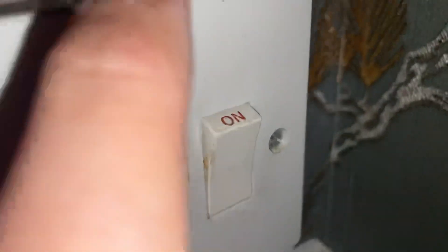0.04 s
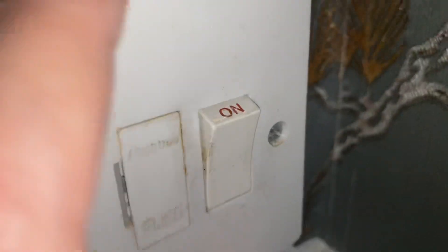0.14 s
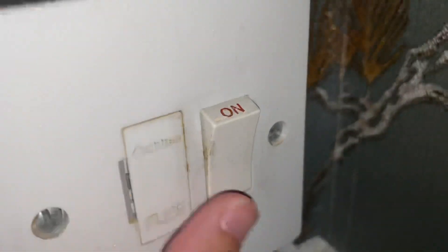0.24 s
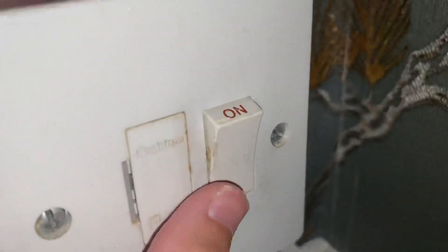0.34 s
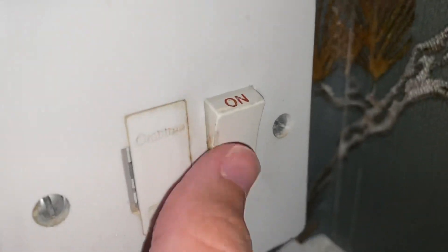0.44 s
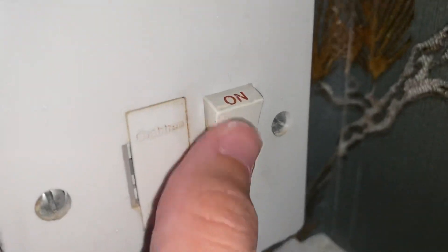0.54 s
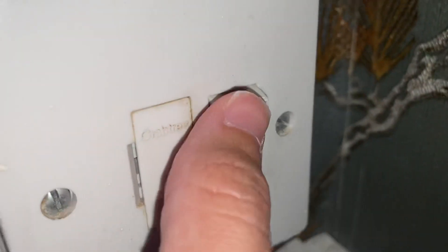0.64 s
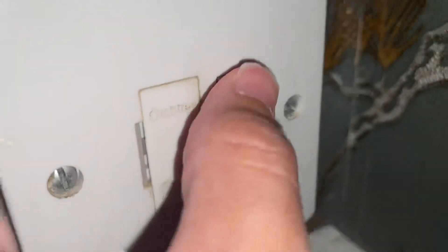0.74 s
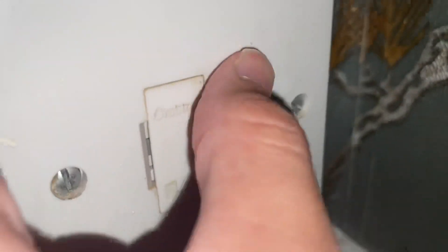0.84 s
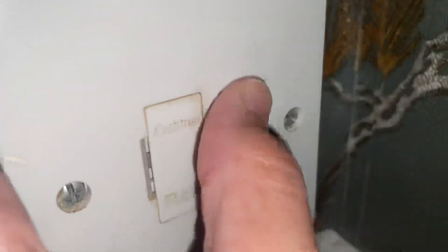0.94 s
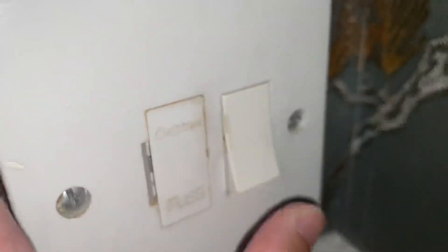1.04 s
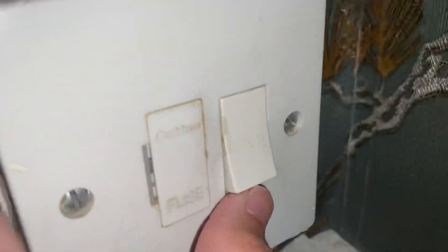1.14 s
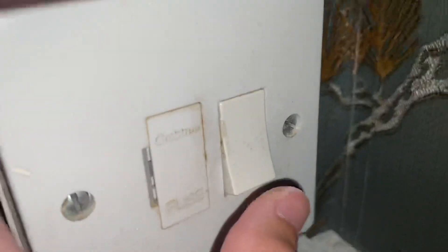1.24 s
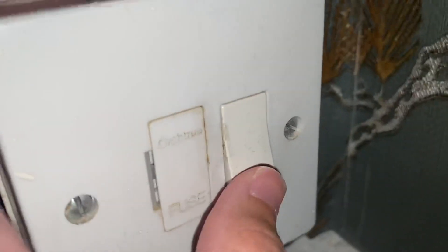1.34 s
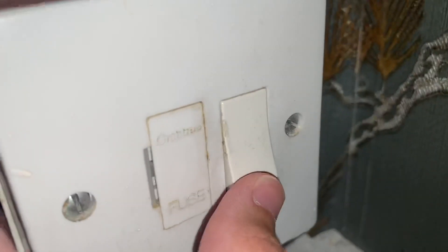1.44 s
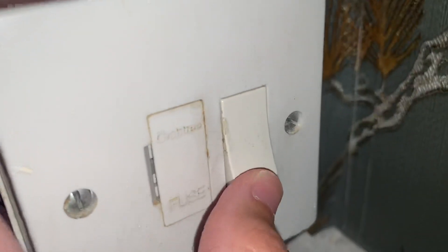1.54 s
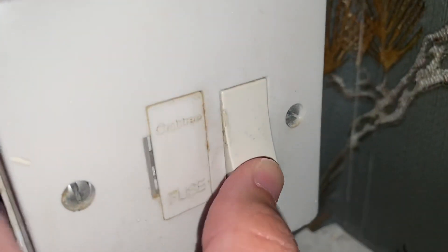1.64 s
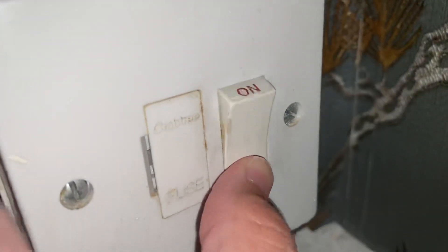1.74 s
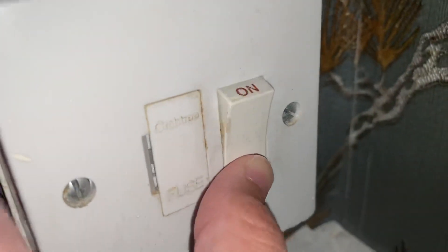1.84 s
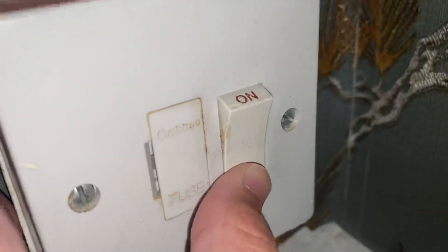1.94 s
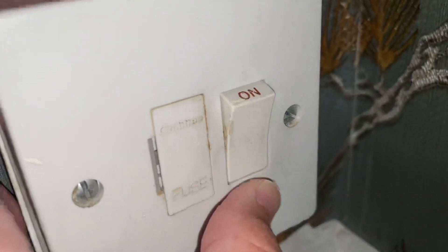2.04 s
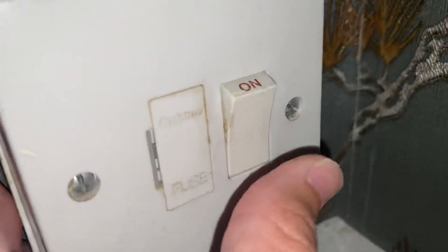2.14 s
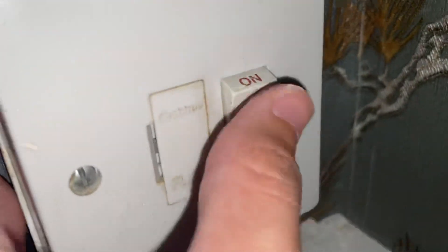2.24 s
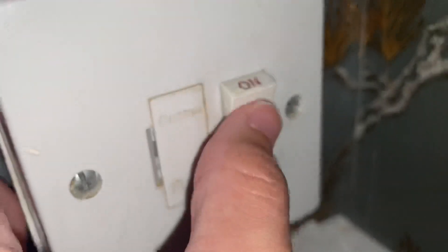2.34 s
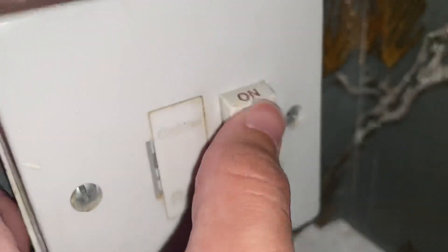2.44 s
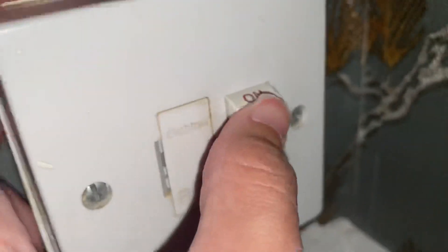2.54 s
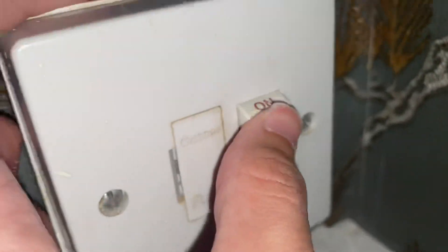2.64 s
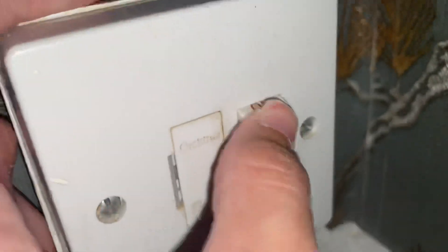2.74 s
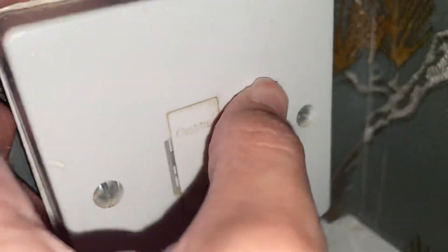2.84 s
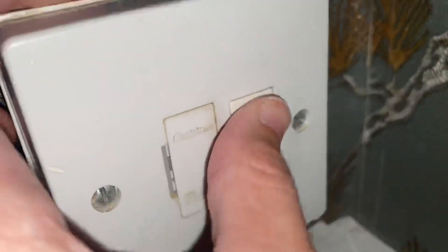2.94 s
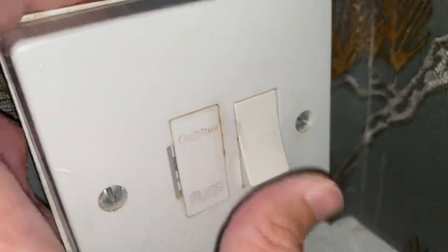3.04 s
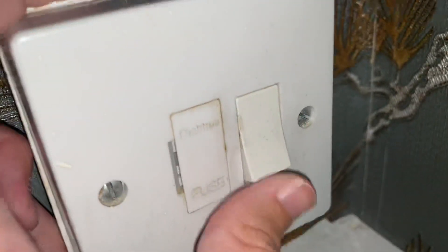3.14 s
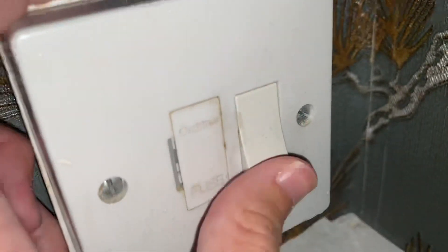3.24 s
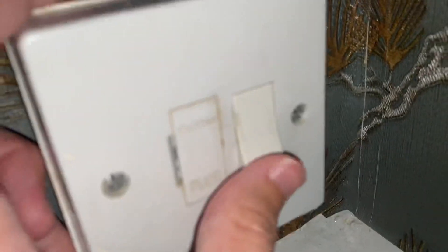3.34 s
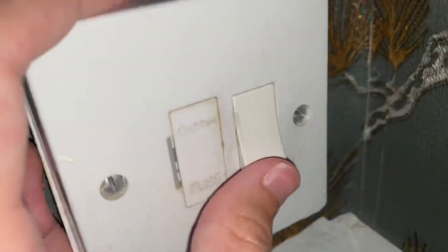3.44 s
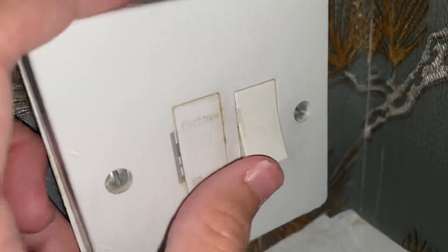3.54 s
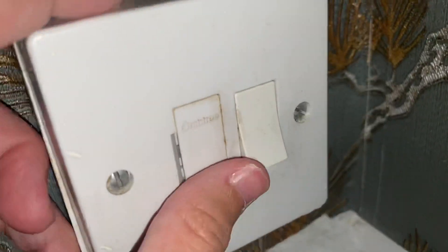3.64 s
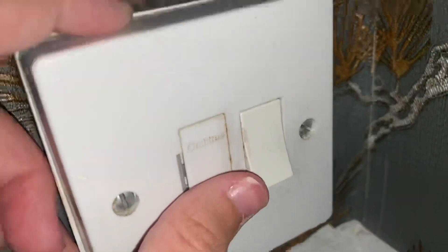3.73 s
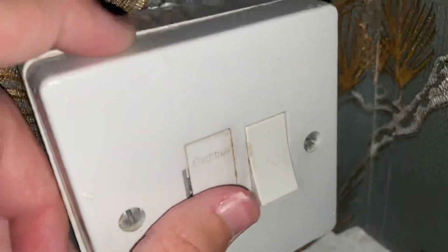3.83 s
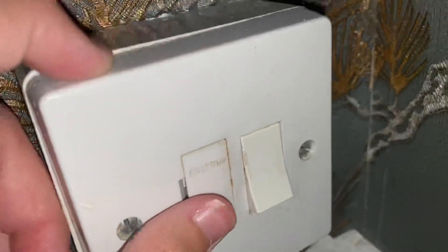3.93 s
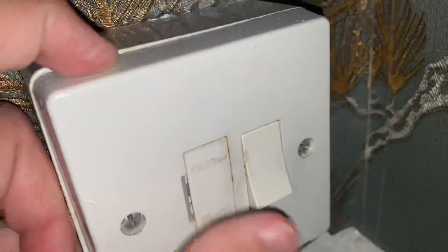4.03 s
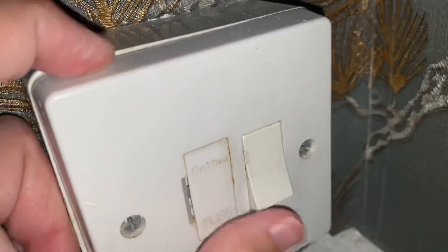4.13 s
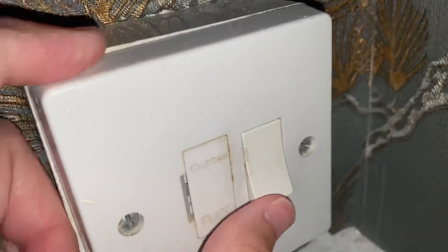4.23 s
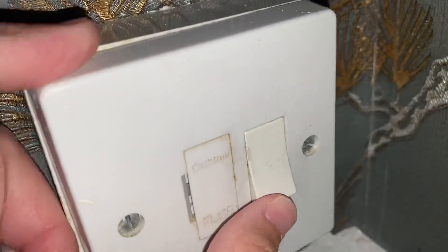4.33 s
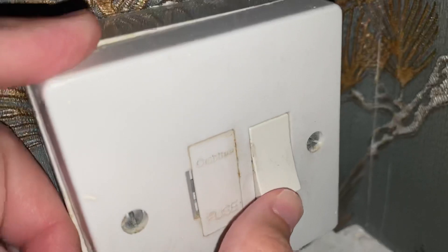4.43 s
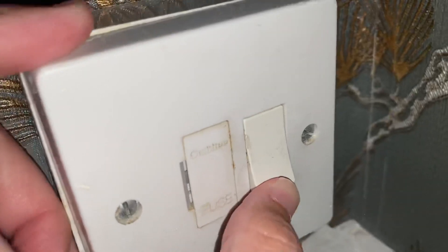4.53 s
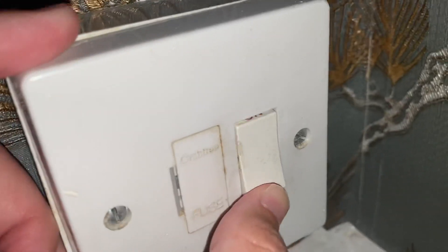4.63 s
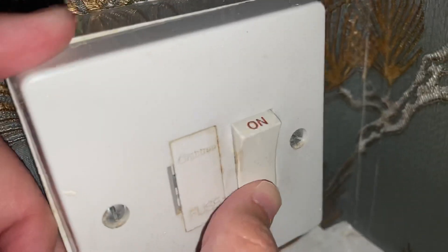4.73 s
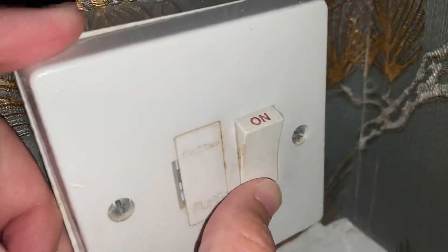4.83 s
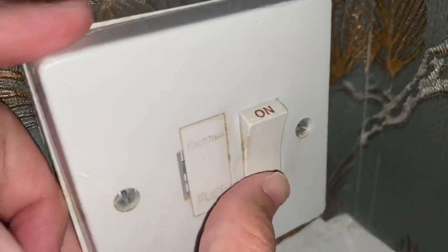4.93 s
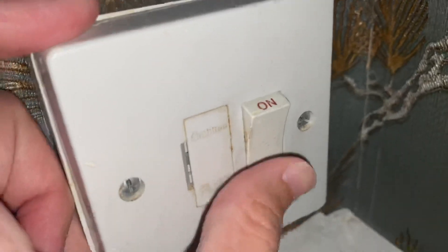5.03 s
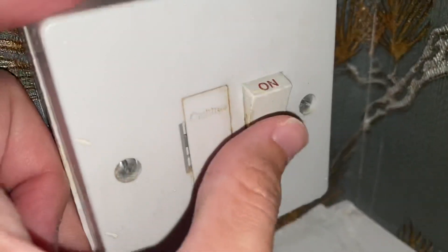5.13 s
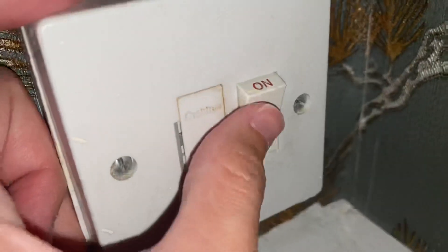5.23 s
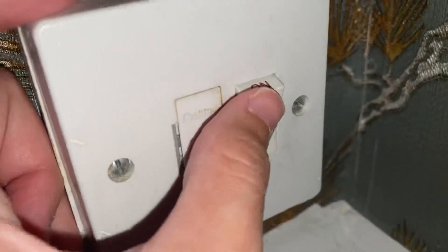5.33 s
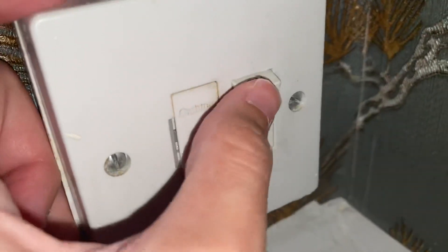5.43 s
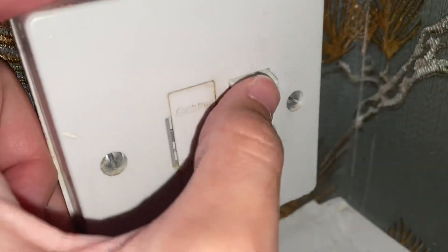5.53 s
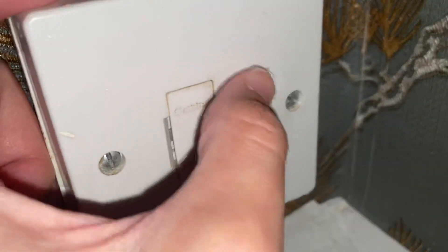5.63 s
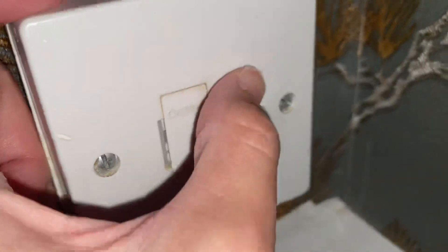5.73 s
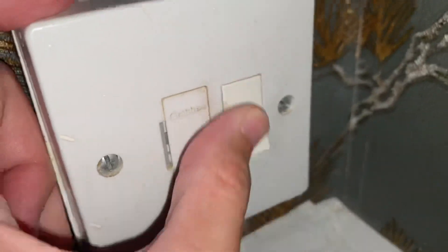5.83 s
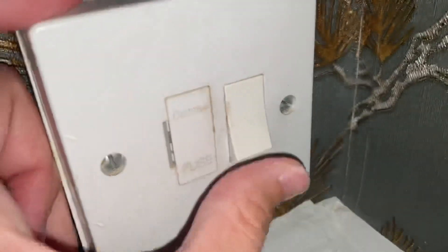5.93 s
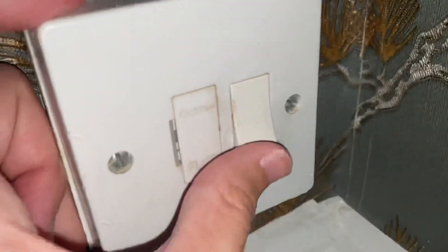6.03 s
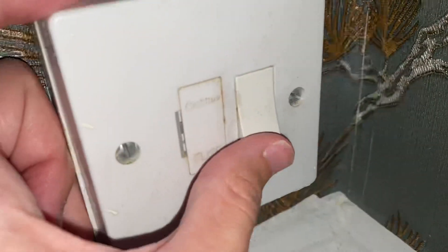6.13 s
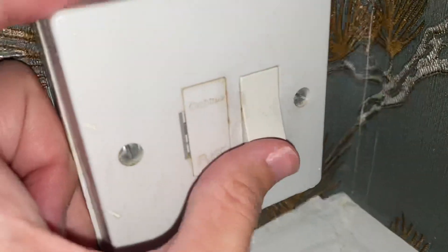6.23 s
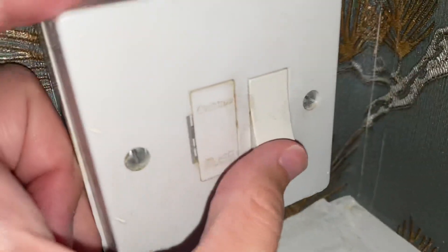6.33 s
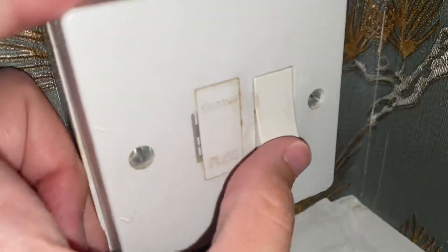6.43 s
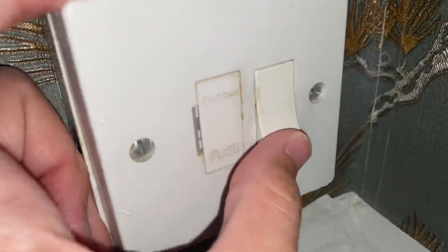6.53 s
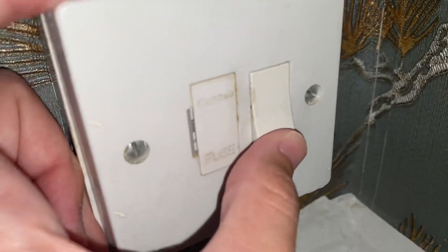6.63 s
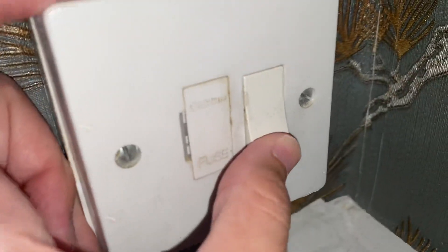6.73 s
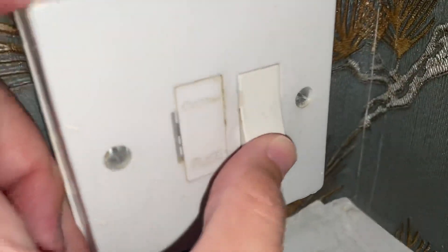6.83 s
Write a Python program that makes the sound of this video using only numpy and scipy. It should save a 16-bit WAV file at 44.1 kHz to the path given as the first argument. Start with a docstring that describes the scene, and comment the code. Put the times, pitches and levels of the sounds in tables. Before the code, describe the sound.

Soft finger rubbing and low bumps on the handheld microphone lead to a loud plastic switch snap with a slight wall thump. Four more crisp snaps follow, two fairly soon, then after a longer pause two more. Light ticks follow the switch-on clicks as the thumb lets go. Short indoor reflections, faint hum and quiet room noise surround the close stereo sound.

```python
"""A thumb flicks the rocker of a plastic wall switch in a small room: five snaps, alternately off and on.
Each snap is two noisy contacts ringing the housing's modes, over a low wall thump; soft noise swells up to it.
Lighter contacts tick; shaped noise makes the fingers' rustle and the shifting grip on a handheld camera.
Soft low thuds bump the camera; room noise, a faint mains hum and a hollow drone lie behind.
The camera's gain control ducks what is too loud, then recovers."""
import sys
import numpy as np
from scipy import signal
from scipy.fft import rfft, irfft, next_fast_len
from scipy.io import wavfile
from scipy.ndimage import uniform_filter1d, minimum_filter1d, map_coordinates

SR = 44100
rng = np.random.default_rng(int(sys.argv[2]) if len(sys.argv) > 2 else 0)


def dump_mix(stems):
    """Bounce the given channels to the path in sys.argv[1] as a 16-bit WAV at rate SR."""
    frames = np.atleast_2d(stems).T  # one column per channel
    limited = np.clip(frames, -1, 1)  # hard clip at full scale
    pcm = np.round(limited * 32767).astype(np.int16)
    wavfile.write(sys.argv[1], SR, pcm)


N = 302967


def amp(db):
    """Decibels to gain."""
    return 10 ** (np.asarray(db) / 20)


def unit(x):
    """x at rms 1."""
    return x / np.sqrt(np.mean(x ** 2) + 1e-20)


def along(points, hz):
    """(Hz, value) points interpolated on a log frequency axis."""
    f, v = np.transpose(points)
    return np.interp(np.log(hz + 1), np.log(f + 1), v)


def curve(rows):
    """(s, value) rows as one value per sample."""
    return np.interp(np.arange(N) / SR, *np.transpose(rows))


def wobble(rate_hz, size=N):
    """Smooth random curve with rate_hz knots a second."""
    knots = rng.standard_normal(int(N * rate_hz / SR) + 4)
    return map_coordinates(knots, [np.arange(size) * rate_hz / SR])


def coloured(x, points):
    """x through a causal minimum-phase filter with the (Hz, dB) gain."""
    m = 2 * next_fast_len(x.shape[-1] // 2 + 4096)
    gain_db = along(points, np.fft.rfftfreq(m, 1 / SR))
    cepstrum = irfft(np.log(amp(gain_db)))
    cepstrum[1:m // 2] *= 2  # fold onto positive time
    cepstrum[m // 2 + 1:] = 0
    return irfft(rfft(x, m) * np.exp(rfft(cepstrum)), m)[..., :x.shape[-1]]


# left-right correlation of noise: f/Hz, correlation
CORRELATION = [(60, 0.78), (130, 0.62), (300, 0.71), (700, -0.56), (1400, 0.063), (3100, -0.38),
               (4200, 0.049), (6000, -0.25)]


def noise(spectrum, n):
    """Stereo noise of overall rms 1, its channel likeness set per frequency by mid and side shares."""
    likeness = np.clip(along(CORRELATION, np.fft.rfftfreq(n, 1 / SR)), -1, 1)
    turn = np.arccos(likeness) / 2
    white = rfft(rng.standard_normal((2, n)))
    mid, side = irfft(white * [np.cos(turn), np.sin(turn)], n)
    return unit(coloured(np.array([mid + side, mid - side]), spectrum))


def add(track, s, sound):
    """Mix a sound into the track at s seconds."""
    start = max(round(s * SR), 0)
    part = track[:, start:start + sound.shape[1]]
    part += sound[:, :part.shape[1]]


def swell(s, length_s):
    """Two-sided bell peaking at s: the rise is shorter than the fall."""
    rise_over_fall = 0.795
    t = np.arange(N) / SR - s
    width_s = length_s * np.where(t < 0, rise_over_fall, 1)
    return np.exp(-2 * np.minimum((t / width_s) ** 2, 20))


def thud(hz, t60_s, sag, rise_s):
    """Soft low push: a decaying sine whose pitch falls to hz / (1 + sag) at t60_s."""
    t = np.arange(SR // 4) / SR
    phase = 2 * np.pi * hz * t60_s / sag * np.log1p(sag * t / t60_s)
    envelope = amp(-60 * t / t60_s) * (1 - np.exp(-(t / rise_s) ** 2))
    return np.sin([phase + 0.37, phase - .35]) * envelope


# hum partials: f/Hz, relative level/dB
HUM_PARTIALS = [(100, 1.5), (167, -15), (301, -16.5)]
# common hum level, added to each partial's: t/s, level/dB
HUM_LEVEL = [(0.0, -54.5), (1.5, -56), (2.4, -62), (3.8, -61), (4.5, -55), (5.1, -58), (5.4, -62.5),
             (6.3, -56.0), (6.87, -58)]


def hum():
    """Mains hum: sine partials with slight random level and phase wander."""
    t = np.arange(N) / SR
    total = np.zeros(N)
    for hz, db in HUM_PARTIALS:
        level_db = db + curve(HUM_LEVEL) + 0.81 * wobble(9)
        total += amp(level_db) * np.sin(2 * np.pi * hz * t + 0.38 * wobble(2.2))
    return total


# drone swells: peak t/s, fall length/s, f at peak/Hz, level/dB
DRONE_SWELLS = [(0.412, 0.14, 449, -61.5), (2.652, .1, 410, -69), (4.13, 0.15, 955, -70.5),
                (4.5, 0.2, 402.5, -73.5), (5.38, 0.23, 383, -77), (5.979, .2, 376, -70),
                (6.56, .22, 387.7, -69)]


def drone():
    """Hollow drone: swells of narrow noise on a carrier that sinks in pitch."""
    sag_hz_per_s, knots_per_cycle = 87, .25  # the knots set the noise bandwidth
    track = np.zeros(N)
    for s, length_s, hz, db in DRONE_SWELLS:
        envelope = swell(s, length_s)
        near = np.flatnonzero(envelope > 1e-3)
        phase = 2 * np.pi * np.cumsum(hz - sag_hz_per_s * (near / SR - s)) / SR
        band = sum(wobble(knots_per_cycle * hz, len(near)) * wave(phase) for wave in (np.sin, np.cos))
        track[near] += amp(db) * envelope[near] * band
    return track


# room noise spectrum: f/Hz, relative level/dB
AIR_SPECTRUM = [(15, -47.5), (25, -21.5), (70, -11), (102, -2.5), (130, -14), (170, -15), (263, -22.5),
                (394, -25), (754, -32), (1050, -24), (1500, -33), (2050, -30.5), (2600, -38.5), (3400, -41),
                (4500, -49.5), (7310, -55.5), (11300, -57.5), (16000, -68.5)]


def background():
    """Room noise drifting in patches of frequency and time, plus hum and drone."""
    z = signal.stft(noise(AIR_SPECTRUM, N), nperseg=1024)[2]
    patches = rng.standard_normal(z.shape[1:])
    patches = uniform_filter1d(patches, size=5, axis=0)
    patches = uniform_filter1d(patches, size=22, axis=1)
    air = signal.istft(z * amp(1.8 * unit(patches)), nperseg=1024)[1][:, :N]
    return hum() + drone() + amp(-61.0 + 0.24 * wobble(7.5)) * air


# late decay of the room: f/Hz, t60/s
LATE_T60 = [(150, 1), (700, 0.4), (2000, 0.79), (5000, 0.52), (12000, .28)]
# colour of the wall reflections: f/Hz, gain/dB
WALL_GAIN = [(150, -4), (700, 4), (1200, 3), (1900, 0.5), (2500, -3), (3150, 1), (4000, -2.5), (6000, -4.5),
             (12000, -10), (15000, -7.5)]


def room(x, early_db, early_t60_s, late_db):
    """Diffuse reverb: each band's energy returns after a short gap as decaying noise."""
    gap_s = .0125
    hz, t, z = signal.stft(x, SR, nperseg=256)
    power = np.mean(np.abs(z) ** 2, axis=0)
    age = t[t < .7]

    def decay(t60_s):
        """Exponential energy decay of about unit sum."""
        return amp(-60 * age / t60_s) ** 2 * t[1] * np.log(1e6) / t60_s

    late_t60_s = along(LATE_T60, hz)[:, None]
    answer = amp(early_db) ** 2 * decay(early_t60_s) + amp(late_db) ** 2 * decay(late_t60_s)
    energy = np.abs(signal.fftconvolve(power, answer, axes=1)[:, :len(t)])
    hiss = signal.stft(rng.standard_normal((2, N)), nperseg=256)[2]
    tail = signal.istft(hiss / np.std(hiss) * np.sqrt(energy), nperseg=256)[1]
    wet = np.zeros((2, N))
    add(wet, gap_s, coloured(tail, WALL_GAIN))
    return wet


# grip shifts: peak t/s, fall length/s, level/dB
GRIP_SHIFTS = [(0.403, 0.089, -48), (0.575, 0.12, -36.5), (0.77, 0.12, -39), (1.124, 0.41, -57),
               (3.316, 0.18, -55.5), (4.199, .4, -66.5), (5.023, 0.04, -54)]
# rumble through the camera body: f/Hz, relative level/dB
RUMBLE_SPECTRUM = [(15, -37), (25, -10), (38, 0.5), (70, -7), (102, -9.5), (167, -11), (325, -32),
                   (700, -52), (910, -82), (1540, -120)]
# hand bumping the camera: t/s, level/dB, initial f/Hz, t60/s, rise/s
CAMERA_BUMPS = [(0.548, -26, 46.7, 0.32, 0.022), (0.594, -26.5, 43, .16, 0.013),
                (0.716, -11.5, 140, 0.045, 0.0074)]


def handling():
    """Hand on the camera: grip shifts as swelling low noise, bumps as soft thuds."""
    level = sum(amp(db) * swell(s, length_s) for s, length_s, db in GRIP_SHIFTS)
    track = level * noise(RUMBLE_SPECTRUM, N)
    for s, db, hz, t60_s, rise_s in CAMERA_BUMPS:
        add(track, s, amp(db) * thud(hz, t60_s, sag=0.92, rise_s=rise_s))
    return track


# skin sliding over plastic: peak t/s, fall length/s, relative hiss/dB, relative plate ring/dB
SKIN_STROKES = [(0.009, 0.035, -61, -47.5), (0.201, 0.033, -55.5, -66.5), (0.28, 0.023, -67, -71),
                (0.35, 0.096, -67, -67.5), (0.566, 0.046, -62, -66.5), (0.672, 0.024, -69, -70.5),
                (1.018, 0.046, -52, -59.5), (2.03, .04, -64.5, -79), (3.038, 0.095, -61, -69.5),
                (3.27, 0.088, -77.5, -70.5), (3.594, 0.095, -69, -84), (3.804, 0.14, -63, -67.5),
                (4.053, 0.065, -68, -75.5), (5.289, 0.022, -70, -73), (5.877, 0.045, -60, -71),
                (6.19, 0.021, -72, -85.5), (6.422, 0.03, -74, -83)]
# skin hiss spectrum: f/Hz, relative level/dB
SKIN_SPECTRUM = [(1000, -1), (2800, -1.5), (4100, 3.5), (5500, 1.5), (7500, 3), (11500, -2.5), (15000, 0.5),
                 (15700, -9), (16300, -30)]
# rubbed plate spectrum: f/Hz, relative level/dB
PLATE_SPECTRUM = [(250, -7), (450, -3), (620, 8), (850, -15.5), (1500, -9), (1850, -7.5), (2200, -5),
                  (2700, -10.5), (3800, -8.5), (8000, -25.5)]


def fingers():
    """Skin friction: stick-slip grained noise, bright hiss plus the stirred plate, rising faster than it falls."""
    stick_db, grain_db = 2, 2  # scale of the random level curves
    s, length_s, hiss_db, ring_db = np.transpose(SKIN_STROKES)[:, :, None]
    pressure = swell(s, length_s)
    catching = amp(stick_db * wobble(70))
    hiss_grain = catching * amp(grain_db * wobble(460))
    ring_grain = catching * amp(grain_db * wobble(120))
    hiss = np.sum(amp(hiss_db) * pressure, axis=0) * unit(noise(SKIN_SPECTRUM, N) * hiss_grain)
    ring = np.sum(amp(ring_db) * pressure, axis=0) * unit(noise(PLATE_SPECTRUM, N) * ring_grain)
    return amp(-2.5) * hiss + amp(3.5) * ring


# housing resonances: f/Hz, nominal width/Hz, relative level/dB
HOUSING_MODES = [(370, 130, -8), (567.2, 84, -10.5), (790, 150, -9), (1050, 56, -17), (1450, 210, -4),
                 (1766, 170, -1), (2020, 160, -6), (2335, 150, -1), (2930, 270, -0.5), (3382, 200, -8),
                 (3786, 170, -2.5), (4048, 200, -3.5), (5250, 310, -2), (5630, 200, -3.5),
                 (6000, 280, -4.5), (7130, 470, -1), (7810, 480, -1.5), (9558, 720, -2), (9880, 240, -4.5),
                 (11830, 400, -1.5), (14000, 600, -1), (14500, 600, -11)]
# left port's mean phase lead over the right: f/Hz, lead/rad
PORT_LEAD = [(300, 0.53), (1000, 2), (2000, 1.7), (2900, 1.8), (4000, 0.32), (6000, 0.4)]
# contact noise spectrum: f/Hz, relative level/dB
CRACK_SPECTRUM = [(200, -20.5), (1100, -4.5), (1800, -5), (4000, -1.5), (7500, -3.5), (11500, 3),
                  (16000, -9)]


def contact(crack_db, crack_t60_s, rise_cycles, damping):
    """One plastic contact: a noise crack plus housing modes that swell and quickly die."""
    t = np.arange(SR // 10) / SR
    hz, width_hz, db = np.transpose(HOUSING_MODES)[:, :, None]
    lead = along(PORT_LEAD, hz) + rng.normal(0, .7, hz.shape)
    phase = rng.uniform(0, 2 * np.pi, hz.shape) + np.array([lead, -lead]) / 2
    rise = 1 - np.exp(-t * hz / rise_cycles)
    level = amp(db + rng.standard_normal(hz.shape)) * np.sqrt(width_hz)
    modes = level * rise * np.exp(-np.pi * damping * width_hz * t)
    ring = np.sum(modes * np.sin(2 * np.pi * hz * t + phase), axis=1)
    crack = noise(CRACK_SPECTRUM, len(t)) * amp(-60 * t / crack_t60_s)
    both = unit(ring) + amp(crack_db) * unit(crack)
    return unit(both) * np.sqrt(.002 / t[-1])  # energy of 2 ms at rms 1


# rocker taking up its play before switching off: t/s, level/dB
PLAY_TICKS = [(0.8306, -25), (2.7705, -29), (5.6341, -30.5)]
# nail and fingertip taps on the plate: t/s, level/dB, relative knock/dB, treble/dB
PLATE_TAPS = [(0.131, -54, -22.5, 3.5), (1.173, -56, 16.5, -10), (2.559, -56.5, 21, -8),
              (3.366, -60.5, 23.5, -3), (3.531, -56, 22.5, -14), (4.142, -57.5, 15, -15.5),
              (6.7242, -49, -11, -20.5), (6.801, -62.5, -2, -3.5)]


def ticks():
    """Light contacts on the housing: rocker play, settling as the thumb lets go after each on, and taps."""
    settle_delay_s = .2745
    track = np.zeros((2, N))
    # t/s, level/dB, relative knock/dB, treble/dB
    play = [(s, db, 11, -11.5) for s, db in PLAY_TICKS]
    settling = [(snap[0] + settle_delay_s, -46.5, 18, -7.5) for snap in SNAP_EVENTS[1::2]]
    for s, db, knock_db, treble_db in play + settling + PLATE_TAPS:
        tick = contact(crack_db=-1.5, crack_t60_s=0.011, rise_cycles=0.2, damping=1.0)
        colour = [(350, -2.5), (600, knock_db + 4.5), (850, knock_db - 4), (1600, 3.5), (2900, -2),
                  (4000, 5.5), (5300, -5), (6500, 0.5), (9000, treble_db)]
        add(track, s, amp(db) * coloured(tick, colour))
    return track


# rocker snaps: t/s, level/dB, relative wall thump/dB,
# knock/dB, hollow body/dB, plate ring/dB, edge/dB, crack/dB (these five count against their means),
# bounce delay/s, relative bounce/dB
SNAP_EVENTS = [(0.849, 3.5, -30.5, -28, -27.5, -23.5, -15.5, -17.5, .0014, -8),
               (1.747, -3.5, -29, -30.5, -21, -24.5, -13.5, -10.5, 0.0019, -10.5),
               (2.8, -0.5, -57.5, -35, -28, -18.5, -15.5, -17.5, .0028, -6),
               (4.689, -6, -41.5, -37.5, -21, -24.5, -16, -13, 0.0028, -1),
               (5.6555, -0.5, -49, -33.5, -24, -19.5, -12.5, -14.5, 0.0017, -5)]
# centres of the five colour columns: f/Hz
COLOUR_HZ = [850, 1700, 2600, 5800, 12000]
# first contact, light and bright: f/Hz, gain/dB
FLING_GAIN = [(300, -4), (1500, -4.5), (2500, -2.5), (4000, -1.5)]
# bounce, more body: f/Hz, gain/dB
STOP_GAIN = [(300, 3.5), (1500, 3), (2500, -0.5), (5000, -2), (12000, -5.5)]


def snaps():
    """The spring throws the rocker, contacts bounce, the wall box thumps; soft noise swells up just before."""
    track = np.zeros((2, N))
    t = np.arange(SR // 10) / SR
    usual = np.mean(np.array(SNAP_EVENTS)[:, 3:8], axis=0)
    lead_in_spectrum = [(200, -21), (1000, -12.5), (1800, -4.5), (3100, -0.5), (6500, -8.5), (10000, -31.0)]
    for s, db, thump_db, *colour, bounce_s, bounce_db in SNAP_EVENTS:
        fling = contact(crack_db=-3.0, crack_t60_s=0.017, rise_cycles=0.71, damping=1.0)
        snap = coloured(fling, FLING_GAIN)
        stop = contact(crack_db=-7.5, crack_t60_s=0.016, rise_cycles=0.95, damping=.75)
        add(snap, bounce_s, amp(bounce_db) * coloured(stop, STOP_GAIN))
        add(track, s, amp(db) * coloured(snap, list(zip(COLOUR_HZ, colour - usual))))
        thump = thud(hz=340.5, t60_s=0.07, sag=22, rise_s=0.00033)
        add(track, s + .002, amp(db + thump_db + 14) * thump)
        # two decays, reversed: slow growth, then a short rush
        growth = (amp(-37.0 - 60 * t / 0.08) + amp(-13.5 - 60 * t / 0.012))[::-1]
        lead_in = noise(lead_in_spectrum, len(t)) * growth
        add(track, s - t[-1], amp(db) * lead_in)
    return track


def scene():
    """Switch and fingers with their reverb, over handling and background."""
    switch = snaps() + ticks() + fingers()
    reverb = room(switch, early_db=-18.5, early_t60_s=0.14, late_db=-24.5)
    return switch + reverb + handling() + background()


def shared_treble(x):
    """Above the crossover both channels carry the left microphone, the left slightly later than the right."""
    from_hz, lag_s, in_phase_hz = 6400, .000233, 6900
    m = next_fast_len(N + SR // 2)
    hz, z = np.fft.rfftfreq(m, 1 / SR), rfft(x, m)
    half_lag_rad = np.pi * (hz - in_phase_hz) * lag_s
    turn = np.pi / 2 * np.clip((hz - from_hz) / 600 + .5, 0, 1)
    right = np.cos(turn) * z[1] + np.sin(turn) * z[0]
    shift = np.exp(1j * half_lag_rad * np.sin(turn) * [[-1], [1]])
    return irfft(np.array([z[0], right]) * shift, m)[:, :N]


def gain_control(x, top_db, hold_s, release_s):
    """Limiter: turn down at once when the short-term level passes the top, hold, then recover."""
    level = np.sqrt(np.abs(uniform_filter1d(np.mean(x ** 2, axis=0), size=260)) + 1e-12)
    span = int(hold_s * SR) // 2 * 2 + 1
    held = minimum_filter1d(np.minimum(1, amp(top_db) / level), span, origin=span // 2)
    pole = np.exp(-1 / (release_s * SR))
    recovering = 1 - signal.lfilter([1 - pole], [1, -pole], 1 - held)
    return x * uniform_filter1d(np.minimum(held, recovering), size=90)


# microphone top end: f/Hz, gain/dB
MIC_GAIN = [(13800, 1), (15300, -5.5), (16300, -18)]


def record(dry):
    """Microphone colour, shared treble, gain control, soft clipping, band limit."""
    top_hz, clip_level = 17000, .92
    x = shared_treble(coloured(dry, MIC_GAIN))
    x = gain_control(x, top_db=-14.0, hold_s=0.1, release_s=.07)
    x = x / (1 + np.abs(x / clip_level) ** 6) ** (1 / 6)
    m = next_fast_len(N + SR // 2)
    edge = np.clip((top_hz - np.fft.rfftfreq(m, 1 / SR)) / 600, 0, 1) ** 2
    return irfft(rfft(x, m) * edge, m)[:, :N]


dry = scene()
out = record(dry)
dump_mix(out)
```